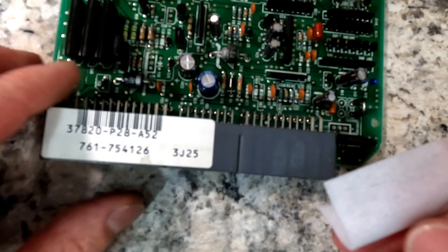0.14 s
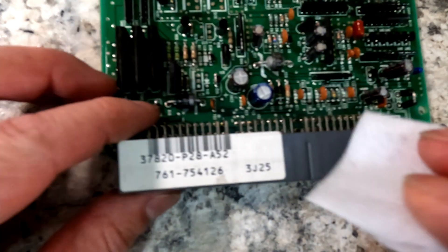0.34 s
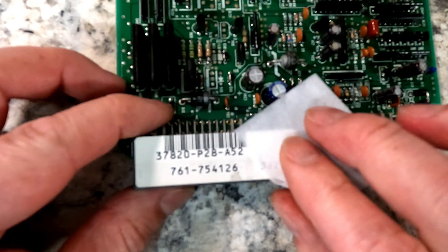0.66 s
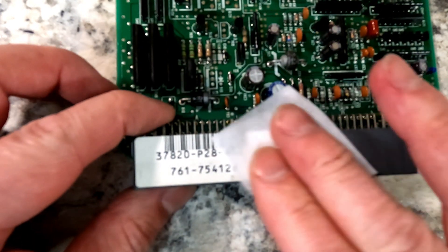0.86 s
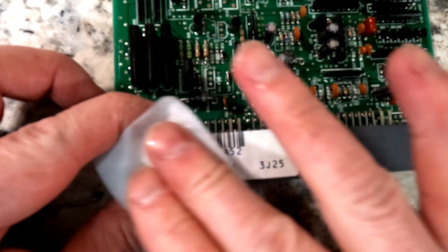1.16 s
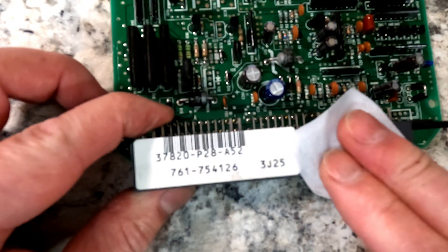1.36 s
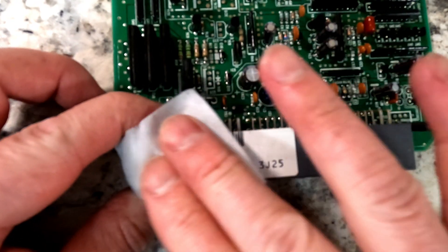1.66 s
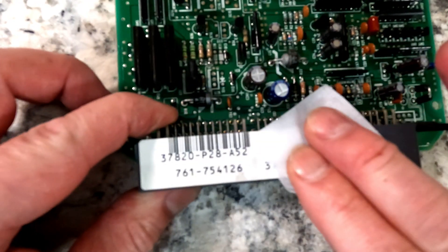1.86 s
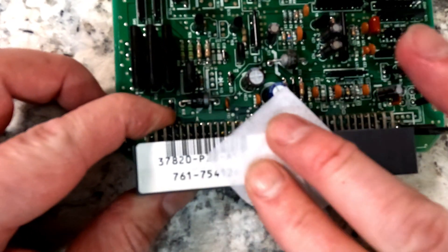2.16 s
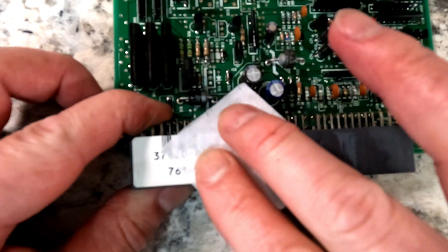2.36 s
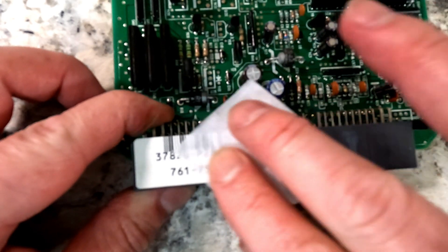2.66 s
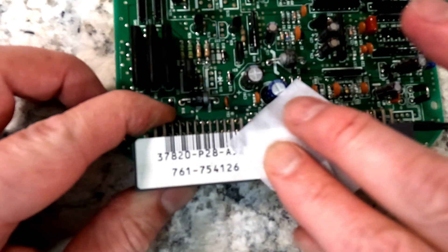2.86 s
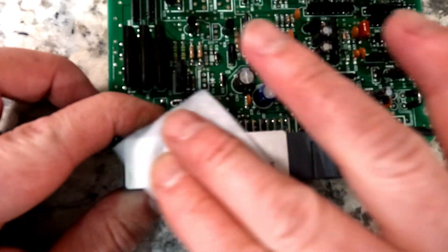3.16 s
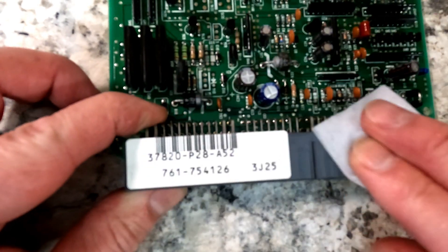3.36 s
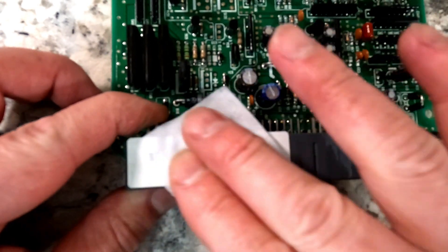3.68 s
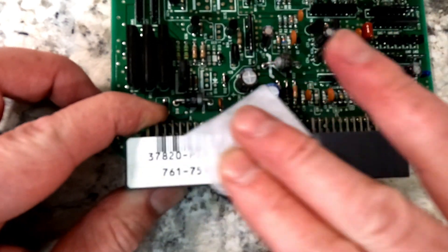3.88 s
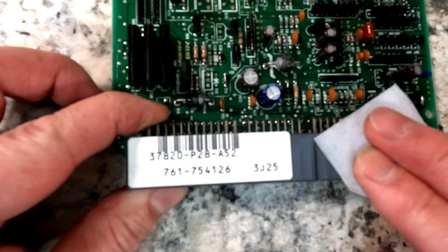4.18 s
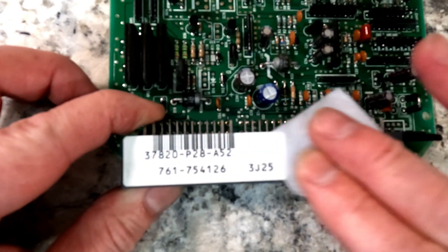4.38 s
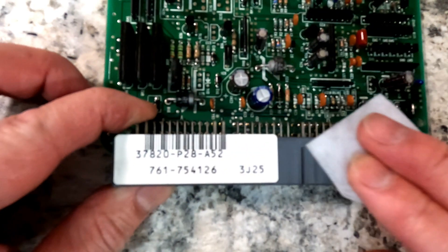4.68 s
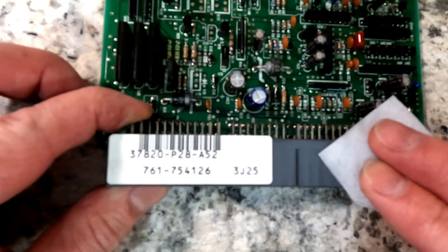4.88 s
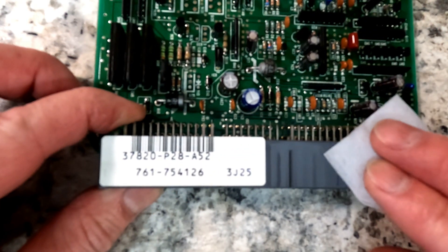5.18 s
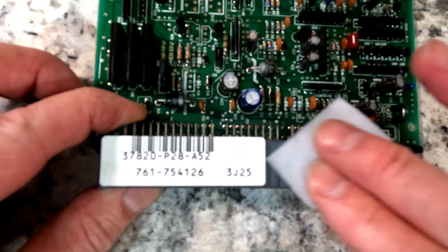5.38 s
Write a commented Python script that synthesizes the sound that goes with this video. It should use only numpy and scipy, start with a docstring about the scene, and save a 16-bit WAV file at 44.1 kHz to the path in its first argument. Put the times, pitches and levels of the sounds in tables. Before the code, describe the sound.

A paper pad rubs back and forth on a circuit board with a soft hiss, and the board clatters briefly against a stone counter.

```python
"""A small room murmurs as a paper pad is rubbed back and forth over the sticker on a circuit board.
The paper's fibres catch and hiss, now and then snapping or squeaking faintly, and keep the board humming.
At 0.45 s the board skids on the stone counter, then knocks lightly; from 2.5 to 2.8 s it tips and
clatters under the fingers. The rubbing goes on, with a few more knocks near 4.7 s. Dull bumps of the
hand reach the close microphone, the strongest at 2.55, 3.2 and 4.85 s."""
import sys
import numpy as np
from scipy import signal
from scipy.fft import rfft, irfft, next_fast_len
from scipy.io import wavfile
from scipy.ndimage import uniform_filter1d

SR = 44100
rng = np.random.default_rng(int(sys.argv[2]) if len(sys.argv) > 2 else 0)


def pcm_store(signal):
    """Save signal as 16-bit PCM."""
    levels = np.round(np.clip(np.atleast_2d(signal), -1, 1) * 32767)
    wavfile.write(sys.argv[1], SR, levels.astype(np.int16).T)


N = 243873
TIME_S = np.arange(N) / SR


def amp(db):
    return 10 ** (np.asarray(db) / 20)


def unit_rms(x):
    return x / np.sqrt(np.mean(x ** 2) + 1e-20)


def over_time(points):
    return np.interp(TIME_S, *np.transpose(points))


def at_hz(points, hz):
    points_hz, values = np.transpose(points)
    return np.interp(np.log(hz + 1), np.log(points_hz), values)


def decay(t, t60_s):
    return np.exp(-np.log(1000) * t / t60_s)


def cut(x, hz, kind="low"):
    return signal.sosfilt(signal.butter(2, min(hz, SR / 2 - 1000), kind, fs=SR, output="sos"), x)


def pan(db):
    return amp(np.array([[db], [-db]]) / 2)


def add(out, start_s, sound):
    at = max(round(start_s * SR), 0)
    out[:, at:at + sound.shape[-1]] += sound[..., :N - at]


# Left-right likeness: (frequency [Hz], correlation [0-1])
STEREO_CORRELATION = [(30, 0.96), (300, .94), (1500, 0.9), (4000, 1), (8000, 0.75), (13000, .25)]
def noise(spectrum, size=N, grain_db=0):
    """Stereo noise of rms 1 from (frequency [Hz], density [dB]); uneven impulses make it grainy."""
    padded = next_fast_len(size)
    hz = np.arange(padded // 2 + 1) * SR / padded
    mid, side = rfft(rng.standard_normal((2, padded)) * amp(grain_db * rng.standard_normal(padded)))
    correlation = np.clip(at_hz(STEREO_CORRELATION, hz), 0, 1)
    pair = np.sqrt(1 + correlation) * mid + np.sqrt(1 - correlation) * side * [[1], [-1]]
    return unit_rms(irfft(pair * amp(at_hz(spectrum, hz)), padded)[:, :size])


def steady(x):
    """Evens out the short-term level of a noise."""
    return x / np.sqrt(uniform_filter1d(np.mean(x ** 2, axis=0), size=96))


def drift(rate_hz):
    """Random curve through points of spread 1."""
    steps = unit_rms(rng.standard_normal(N))
    return np.interp(TIME_S * rate_hz, np.arange(N), steps)


def wander(x, share, rate_hz):
    """Slides all frequencies up and down by a small share."""
    position = np.cumsum(1 + share * np.tanh(drift(rate_hz))) % N
    return np.array([np.interp(position, np.arange(N), side) for side in x])


def resonate(x, peaks):
    """Parallel resonators (frequency [Hz], width [Hz], level [dB]); output rms 1."""
    out = 0
    for k, (hz, width_hz, db) in enumerate(peaks):
        r = np.exp(-np.pi * width_hz / SR)
        band = signal.lfilter([1, 0, -1], [1, -2 * r * np.cos(2 * np.pi * hz / SR), r * r], x)
        out = out + (-1) ** k * amp(db) * (1 - r * r) * band
    return unit_rms(out)


# Room tone: (frequency [Hz], density [dB])
MURMUR_SPECTRUM = [(15, 1), (45, 0.5), (75, -11), (118, -4.5), (160, -6.5), (210, -7), (330, -5.5),
                   (450, -11.5), (800, -25), (1500, -31), (4000, -42.5), (7000, -43.5), (9000, -54),
                   (15000, -59.5)]
def room_murmur(level_db=-49):
    """The room's steady low noise."""
    return noise(MURMUR_SPECTRUM) * amp(level_db)


def room_reverb(x, t60_s=0.45, wall_hz=7000, first_echo_s=0.0084):
    """The walls return a short diffuse tail, different on each side."""
    t = np.arange(SR // 2) / SR
    tail = cut(rng.standard_normal((2, len(t))), wall_hz) * decay(t, t60_s) * (t > first_echo_s)
    return signal.fftconvolve(x, unit_rms(tail) / np.sqrt(len(t)), axes=1)[:, :N]


# Sway rumble: (time [s], level [dB])
SWAY_LEVELS = [(0, -53), (1.1, -44), (1.7, -44.5), (2.0, -41), (2.5, -43.5), (2.9, -59), (3.1, -40),
               (3.5, -53), (4.0, -61), (4.4, -42), (4.7, -47.5), (5.53, -50)]
def microphone_sway():
    """The working hand sets the microphone swaying."""
    rumble = noise([(10, -14), (24, -1.5), (31, -6), (45, -6.5), (100, -43), (1000, -94.5)])
    return rumble * amp(over_time(SWAY_LEVELS))


# Modes shaken by a bump: (frequency [Hz], level [dB], t60 [s])
WOBBLE_MODES = [(23.5, -20, 0.84), (42.76, -35, 0.32), (67.8, -22.5, 0.44), (113.4, -24.5, 0.22),
                (147.3, -25, 0.22), (211.6, -22.5, 0.09)]
# Hand bumps: (time [s], level [dB], damped after [s], left over right [dB])
HAND_BUMPS = [(1.085, -21, 0.022, -1), (2.474, -16, .02, 1), (2.551, 4, 0.011, 0.5), (3.1807, 0, .115, 4),
              (4.847, 1.5, 0.224, 4.5)]
def hand_bumps(contact_s=0.0038, flesh_hz=330, shudder_db=-36, shudder_t60_s=0.87, damped_t60_s=0.051):
    """Soft blows set off low wobbles, which ring until the hand settles and damps them."""
    out, t = np.zeros((2, N)), np.arange(SR) / SR
    wobble = sum((-1) ** k * amp(db) * np.sin(2 * np.pi * hz * t) * decay(t, t60_s)
                 for k, (hz, db, t60_s) in enumerate(WOBBLE_MODES))
    for start_s, db, free_s, pan_db in HAND_BUMPS:
        rumble = noise([(30, -41), (160, 4), (250, -25), (450, -20), (2000, -50)], len(t))
        shudder = amp(shudder_db) * rumble * decay(t, shudder_t60_s)
        envelope = (1 - np.exp(-t / contact_s)) * decay(np.maximum(t - free_s, 0), damped_t60_s)
        add(out, start_s, amp(db) * pan(pan_db) * cut((wobble + shudder) * envelope, flesh_hz))
    return out


# Circuit board modes: (frequency [Hz], level [dB], t60 [s])
BOARD_MODES = [(104, -23, 0.35), (172, -17, 0.16), (199.3, -15, 0.28), (249.5, -18.5, 0.14),
               (298.5, -18, .2), (363, -24.5, .22), (436, -23.5, 0.34), (743, -35, .24), (926, -33, .25),
               (1277, -25, 0.057), (1412.5, -16, 0.036), (1434, -11, .13), (1540, -20.5, 0.093),
               (1612, -23, .16), (1797, -25, .17), (2213, -28, .12), (2400, -29.5, .14), (2622, -24, .14),
               (2950, -24, .16), (3170, -21, 0.13), (3720, -29.5, 0.11), (3790, -30, 0.1395),
               (5050, -36, .15)]
def driven_board(force, damping_hz):
    """The board's modes under a running force, widened by the fingers that hold it."""
    peaks = [(hz, np.log(1000) / (np.pi * t60_s) + damping_hz, db) for hz, db, t60_s in BOARD_MODES]
    return resonate(force, peaks)


def struck_board(t, thud_db, thud_below_hz=500, level_db=-0.5, spread_db=5, detune=0.004):
    """The board rings freely; the grip differs from knock to knock and detunes each mode."""
    hz, mode_db, t60_s = np.transpose(BOARD_MODES)[:, :, None]
    scatter_db = spread_db * rng.standard_normal(hz.shape)
    strength = amp(mode_db + level_db + thud_db * (hz < thud_below_hz) + scatter_db)
    held_hz = hz * (1 + detune * rng.standard_normal(hz.shape))
    polarity = rng.choice([-1, 1], hz.shape)
    return np.sum(strength * polarity * np.sin(2 * np.pi * held_hz * t) * decay(t, t60_s), axis=0)


def board_hum():
    """Friction keeps the board humming."""
    spectrum = [(100, -7.5), (300, -10), (800, 2), (1450, -10), (1850, -7), (2200, -10), (6000, -23)]
    return driven_board(noise(spectrum, grain_db=8), damping_hz=25)


def board_skid(peak_s=0.447, level_db=-34, rise_s=0.0095, hold_s=0.03, t60_s=0.5, judder_db=5):
    """The board skids once as the pad lands; its feet judder on the stone."""
    judder = amp(judder_db * np.tanh(drift(rate_hz=118.4)))
    feet = noise([(60, -4.5), (200, -1.5), (300, 5.5), (450, -10), (730, 10.5), (1100, -12.5),
                  (3000, -20), (9000, -14)], grain_db=7.5)
    swell = np.exp(np.minimum(TIME_S - peak_s, 0) / rise_s)
    release = decay(np.maximum(TIME_S - peak_s - hold_s, 0), t60_s)
    return driven_board(feet * judder, damping_hz=39.7) * amp(level_db) * swell * release


# Grit on stone: (frequency [Hz], density [dB])
GRIT_SPECTRUM = [(450, -15), (600, -10), (730, 6), (900, -6), (1050, 0.5), (2000, -7), (2800, -4),
                 (4500, -14.5), (7000, -22), (13000, -40)]
def grit_scrape(peak_s=0.4757, half_width_s=0.016, level_db=-41):
    """Grit scrapes under the skidding feet."""
    swell = 1 / (1 + ((TIME_S - peak_s) / half_width_s) ** 2)
    return noise(GRIT_SPECTRUM, grain_db=9.5) * amp(level_db) * swell


# First contact: (frequency [Hz], width [Hz], level [dB])
CLICK_PEAKS = [(1590, 550, 8), (3010, 830, 9), (5000, 1100, 0.5)]
# Dense, quickly damped board vibration: (frequency [Hz], density [dB])
CRACK_SPECTRUM = [(170, 4), (520, -4), (850, -4), (1250, -1), (1450, 1.5), (2000, -3.5), (2850, -7),
                  (3400, -12.5), (3650, -4), (4400, -17.5), (5400, -10), (8000, -22.5), (12000, -24),
                  (16000, -37.5)]
# Knocks: (time [s], level [dB], click offset [dB], thud offset [dB], rattle offset [dB])
BOARD_KNOCKS = [(0.7756, -42, -8, 6, -12), (0.534, -38.5, 8.5, 13.5, 8), (1.611, -42, -4, 0, -2),
                (2.1054, -28.5, -5, 10.5, 4.5), (2.2922, -43.5, 11.5, -8, -12),
                (2.475, -40, -3, 14.5, -5),(2.5502, -2.5, 1.5, -3, -5.5), (2.6224, -11, -14, -3, 5.5),
                (2.6726, -6, -13, -5, -8.5), (2.682, -14.5, 5, -5.5, 6), (2.715, -24.5, 8, 7, 9),
                (2.7481, -25, 4, 6.5, -2), (2.7848, -33.5, 2, 6.5, 7.5), (3.059, -45.5, 7.5, -6, -9),
                (3.1787, -42, 5, -6, 11.5), (3.4702, -30.5, -5.5, 1, 5), (4.6533, -24, 5.5, 5.5, 4),
                (4.6925, -26, 3.5, 6.5, 3), (4.7019, -36.5, 14, 18, 17), (5.5123, -36.5, -5, 4, 0)]
def board_knocks(crack_db=-7.5, crack_t60_s=0.035, rattle_db=-17, rattle_t60_s=0.25, rise_s=0.0014,
                 contact_hz=8700, db_per_octave=19.5):
    """The board hits the counter: click, crack, rattle of loose parts, ring. Weak knocks are duller."""
    out, t = np.zeros((2, N)), np.arange(SR // 3) / SR
    impulse = signal.unit_impulse(len(t)) + 1e-18
    click = resonate(resonate(impulse, CLICK_PEAKS), CLICK_PEAKS)
    click /= np.abs(click).max()
    attack = 1 - np.exp(-t / rise_s)
    for start_s, db, click_db, thud_db, loose_db in BOARD_KNOCKS:
        ring = struck_board(t, thud_db)
        vibration = steady(noise(CRACK_SPECTRUM, len(t))) * attack
        crack = vibration * amp(crack_db) * decay(t, crack_t60_s)
        rattle = vibration * amp(rattle_db + loose_db) * decay(t, rattle_t60_s)
        cutoff_hz = contact_hz * 2 ** (db / db_per_octave)
        add(out, start_s, amp(db) * cut(amp(click_db) * click + crack + rattle + ring, cutoff_hz))
    return out


# Rough low note: (frequency [multiple of the note], width [Hz], level [dB])
LOW_NOTE_PEAKS = [(1, 90, 7), (1.13, 110, 0.5), (1.3, 160, -5), (1.8, 400, -12)]
# Thin high note: (frequency [Hz], width [Hz], level [dB])
HIGH_NOTE_PEAKS = [(5860, 80, -3.5), (5250, 500, -18)]
# Squeaks: (peak time [s], swell sigma [s], low note [Hz], low level [dB], high level [dB])
PAD_SQUEAKS = [(0.787, 0.0065, 1370, -53.5, -76), (0.923, 0.0049, 1430, -52.5, -82),
               (1.133, 0.0086, 1430, -51, -76), (1.059, 0.013, 764, -52, -78),
               (2.432, 0.016, 1060, -53.5, -77), (3.589, 0.02, 793, -53, -67.5),
               (3.731, 0.013, 757, -43, -50.5), (4.153, 0.007, 1370, -50, -72),
               (4.19, 0.075, 790, -64.5, -67), (4.7314, 0.0031, 1410, -33, -72),
               (4.849, .014, 940, -50.5, -58), (4.941, 0.037, 800, -51.5, -64),
               (5.146, 0.012, 780, -57.5, -63), (5.343, 0.011, 813, -59.5, -64.5)]
def pad_squeaks():
    """Stick and slip narrows the friction into two notes."""
    out, t = np.zeros((2, N)), np.arange(SR // 3) / SR
    middle_s = t[-1] / 2
    for peak_s, sigma_s, note_hz, low_db, high_db in PAD_SQUEAKS:
        swell = np.exp(-((t - middle_s) / sigma_s) ** 2 / 2)
        swell_rms = np.sqrt(np.mean(swell ** 2))
        slips = noise([(100, 0), (10000, 0)], len(t))
        low_peaks = [(note_hz * multiple, width_hz, db) for multiple, width_hz, db in LOW_NOTE_PEAKS]
        for peaks, db in ((low_peaks, low_db), (HIGH_NOTE_PEAKS, high_db)):
            note = unit_rms(resonate(slips, peaks) * swell) * swell_rms
            add(out, peak_s - middle_s, amp(db) * note)
    return out


# Snap colour: (frequency [multiple of the centre], density [dB])
SNAP_SPECTRUM = [(.1, -6), (.5, 5), (1, 4.5), (1.7, -4), (3.299, -23)]
# Snaps and crinkles: (time [s], level [dB], t60 [s], centre [Hz])
PAPER_SNAPS = [(0.0782, -33.5, 0.011, 5200), (.0850, -47, 0.042, 4550), (.1120, -53, 0.022, 6000),
               (0.13, -53.5, 0.022, 4020), (0.271, -63.5, 0.025, 7060), (0.404, -51, 0.058, 3490),
               (.7530, -63, 0.17, 12000), (.7760, -56.5, 0.047, 9600), (.877, -54, 0.063, 3380),
               (0.982, -57, 0.087, 3040), (2.54, -34, 0.066, 2530), (4.7375, -38.5, 0.011, 5730),
               (5.0188, -47.5, 0.038, 4230)]
def paper_snaps():
    """The stiff edge of the paper flicks free."""
    out, t = np.zeros((2, N)), np.arange(SR // 10) / SR
    for start_s, db, t60_s, centre_hz in PAPER_SNAPS:
        spectrum = [(centre_hz * multiple, density_db) for multiple, density_db in SNAP_SPECTRUM]
        add(out, start_s, amp(db) * steady(noise(spectrum, len(t))) * decay(t, t60_s))
    return out


def stroke_speed_db(start_s, stop_s, fastest, swell_db):
    """The hand speeds up to 0 dB at its fastest moment and slows again."""
    progress = np.clip((TIME_S - start_s) / (stop_s - start_s), 0, 1)
    past_peak = progress - np.clip(fastest, 0.02, 0.98)
    return -swell_db * (past_peak / np.where(past_peak < 0, past_peak[0], past_peak[-1])) ** 2


# Pad strokes: (start [s], stop [s], friction [dB], fastest moment [0-1], swell [dB],
# treble [dB], board hum [dB])
PAD_STROKES = [ (0, .028, -39, 0, 10.5, -1.5, -54), (0.035, .14, -56, 0.1, 11, 1, -72),
               (0.399, 0.749, -59, 0.97, 11, -14, -51.5), (0.766, 0.843, -52, 1, 13, -23, -59),
               (0.872, 0.938, -57.5, .8, 11, -14, -53), (1.018, 1.289, -48, 0.97, 7.5, 3, -56.5),
               (1.349, 1.569, -48.5, 0, 1.5, -0.5, -55.5), (1.625, 1.825, -51, .35, 1.5, 2, -55.5),
               (1.878, 2.049, -51.5, 0.4, 1, 6.5, -57), (2.123, 2.234, -49.5, 1, 2, 5, -53),
               (2.311, 2.391, -47, 0.05, 5, 0.5, -55), (2.471, 2.538, -52, 0.8, 5, 7.5, -53.5),
               (2.807, 2.895, -60.5, .8, 0.5, 9.5, -57.5), (2.959, 3.047, -58.5, 0, 1.5, 8.5, -63.5),
               (3.095, 3.274, -57.5, 0.96, 6, 8.5, -72.5), (3.328, 3.605, -53.5, .75, 0.5, 3, -57.5),
               (3.668, 3.95, -50.5, 0.32, 11.5, 3.5, -58), (4.003, 4.318, -54, 0.62, 7, 5, -57),
               (4.455, 4.67, -51.5, 0.91, 15, 2.5, -56), (4.715, 4.994, -53, 0.52, 6.5, 1, -50.5),
               (5.044, 5.216, -62.5, .45, 2.5, -7, -56.5), (5.335, 5.395, -58.5, 0.33, 7, -6, -56),
               (5.494, 5.535, -49, .9, 10, 0.5, -49.5), ]
def hand_strokes(turn_s=0.015, creep_db=-32, creep_s=0.06, dull_db=6, dull_s=0.018,
                 treble_share=0.35, hum_share=0.55, hum_linger_s=0.08):
    """Friction, treble and hum follow hand speed; at each turn the friction dulls and sinks to a creep."""
    friction_gain, treble_db, hum_gain = np.zeros((3, N))
    for start_s, stop_s, db, fastest, swell_db, top_db, hum_db in PAD_STROKES:
        speed_db = stroke_speed_db(start_s, stop_s, fastest, swell_db)
        before_s, after_s = np.maximum(start_s - TIME_S, 0), np.maximum(TIME_S - stop_s, 0)
        outside_s = before_s + after_s
        inside_s = np.maximum(np.minimum(TIME_S - start_s, stop_s - TIME_S), 0)
        gate = 1 / (1 + (outside_s / turn_s) ** 2) ** 2
        creep = amp(creep_db) * np.exp(-outside_s / creep_s)
        sliding = amp(db + speed_db) * (gate + creep)
        stroke_treble_db = top_db + treble_share * speed_db - dull_db * np.exp(-inside_s / dull_s)
        treble_db = np.where(sliding > friction_gain, stroke_treble_db, treble_db)
        friction_gain = np.maximum(friction_gain, sliding)
        hum_gate = np.exp(-before_s / turn_s - after_s / hum_linger_s)
        hum_gain = np.maximum(hum_gain, amp(hum_db + hum_share * speed_db) * hum_gate)
    return friction_gain, treble_db, hum_gain


# Echoes off counter and hands: (delay at one stroke end [s], delay at the other [s], level [dB])
NEAR_ECHOES = [(.00058, 0.00043, -15), (.00145, 0.0028, -11), (.0029, 0.0021, -9.5), (.0052, 0.0052, -7)]
def near_echoes(x):
    """Echoes comb the hiss; their paths stretch and shrink as the pad travels."""
    turns_s = np.sort([s for stroke in PAD_STROKES for s in stroke[:2]])
    position = np.interp(TIME_S, turns_s, np.resize([0, 1, 1, 0], len(turns_s)))
    out = x
    for from_s, to_s, db in NEAR_ECHOES:
        delayed_s = TIME_S - from_s - (to_s - from_s) * position
        out = out + amp(db) * np.array([np.interp(delayed_s, TIME_S, side) for side in x])
    return out / np.sqrt(1 + sum(amp(db) ** 2 for _, _, db in NEAR_ECHOES))


# Pad resonances: (frequency [Hz], width [Hz], level [dB])
PAD_PEAKS = [(2500, 160, -2), (2750, 170, 3.5), (2910, 210, 2), (3840, 160, -8), (4520, 160, -6.5),
             (5470, 200, -8.5), (6100, 180, -8), (6950, 460, -10), (8790, 110, -12)]
def pad_ring(swell_db=3.5):
    """Each resonance swells and fades by itself as the pad travels; finger pressure retunes them all."""
    slips = noise([(1000, 0), (10000, 0)], grain_db=3.5)
    ring = 0
    for k, (hz, width_hz, db) in enumerate(PAD_PEAKS):
        band = resonate(slips, [(hz, width_hz, 0)]) * np.sqrt(width_hz)
        ring = ring + (-1) ** k * band * amp(db + swell_db * drift(rate_hz=25))
    return wander(unit_rms(ring), share=0.025, rate_hz=9)


# Paper on the sticker: (frequency [Hz], density [dB])
FRICTION_SPECTRUM = [(470, -38.5), (790, -6.5), (880, -18), (1040, -3), (1200, -6.5), (1390, -2.5),
                     (1680, -11.5), (1840, -1.5), (1980, -8.5), (2800, -2), (4250, -9), (5100, -5.5),
                     (8100, -13), (10400, -14), (13200, -22.5), (15500, -52)]
# Pad ring within the friction: (time [s], level [dB])
RING_LEVELS = [(0, -13.5), (2.9, -4.5), (3.8, -6.5), (4.4, -1), (5.5, -6.5)]
def pad_rubbing(friction_gain, treble_db, hiss_db=-3, flutter_db=1.83, shelf_hz=8000):
    """Paper fibres catch in countless tiny slips; a faster stroke lifts the treble."""
    ring = amp(over_time(RING_LEVELS)) * pad_ring()
    hiss = amp(hiss_db) * noise(FRICTION_SPECTRUM, grain_db=4.5)
    rub = hiss + ring
    treble = cut(cut(rub, shelf_hz, "high")[:, ::-1], shelf_hz, "high")[:, ::-1]   # zero phase
    rub = rub + treble * (amp(treble_db) - 1)
    return rub * friction_gain * amp(flutter_db * drift(rate_hz=90))


def scene(board_reverb_db=-28.5, pad_reverb_db=-19):
    """Board and pad close by, the room's murmur behind."""
    friction_gain, treble_db, hum_gain = hand_strokes()
    board = board_knocks() + board_hum() * hum_gain + board_skid() + grit_scrape()
    pad = near_echoes(pad_rubbing(friction_gain, treble_db)) + paper_snaps() + pad_squeaks()
    background = room_murmur() + microphone_sway() + hand_bumps()
    reverb = room_reverb(amp(board_reverb_db) * board + amp(pad_reverb_db) * pad)
    return background + reverb + board + pad


# Microphone port mismatch: (frequency [Hz], left over right [dB])
PORT_MISMATCH = [(60, 1.1), (300, -0.5), (1400, 0.7), (3000, 0.7), (7000, -0.4), (15000, -2)]
def record(dry, left_lag_s=0.000012, stopband_hz=16200):
    """The two ports differ slightly in colour and arrival time; peaks are rounded and the top is cut."""
    size = next_fast_len(N + 100)
    hz = np.arange(size // 2 + 1) * SR / size
    lean = amp(at_hz(PORT_MISMATCH, hz) / 2)
    response = np.array([lean * np.exp(-2j * np.pi * hz * left_lag_s), 1 / lean])
    ports = irfft(rfft(dry, size) * response, size)[:, :N]
    rounded = ports / (1 + ports ** 6) ** (1 / 6)
    return signal.sosfilt(signal.cheby2(16, 70, stopband_hz, fs=SR, output="sos"), rounded)


dry = scene()
out = record(dry)
pcm_store(out)
```